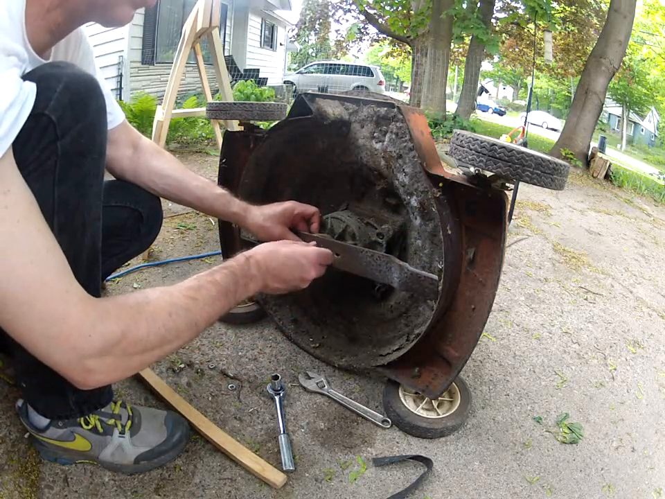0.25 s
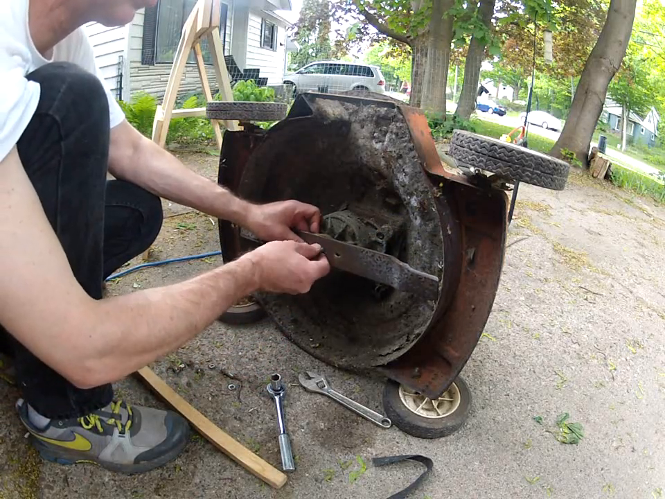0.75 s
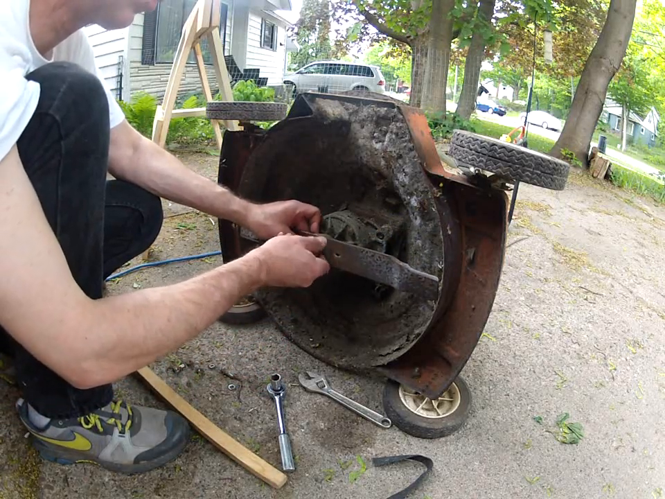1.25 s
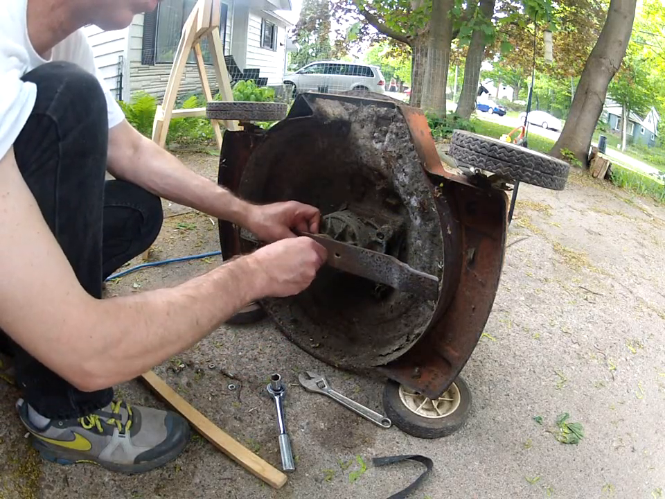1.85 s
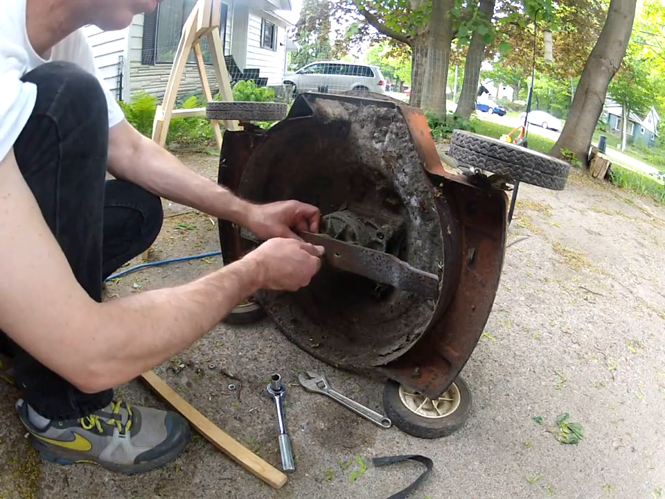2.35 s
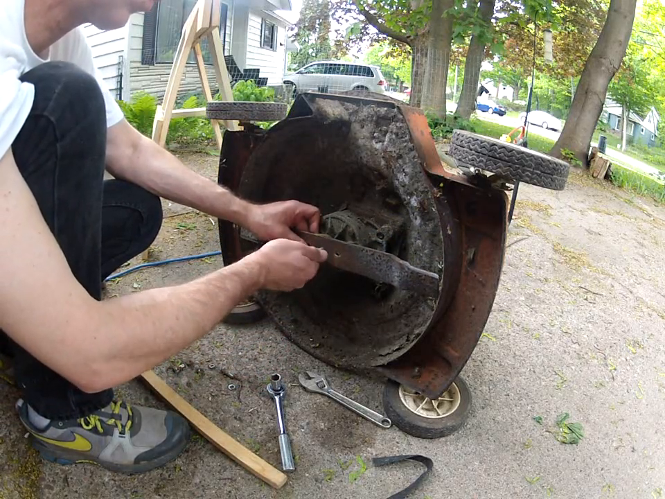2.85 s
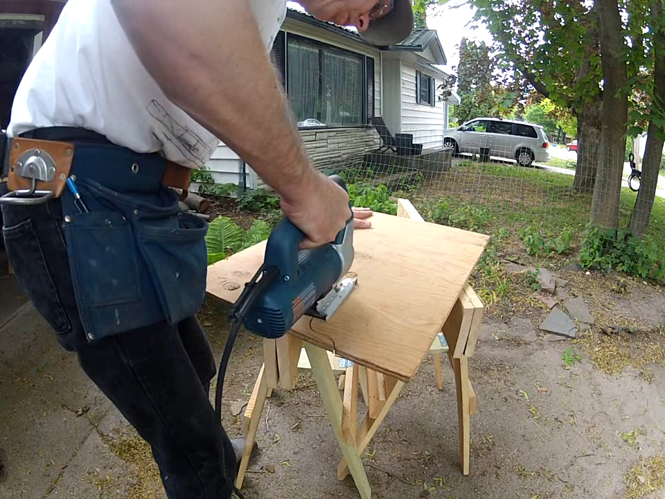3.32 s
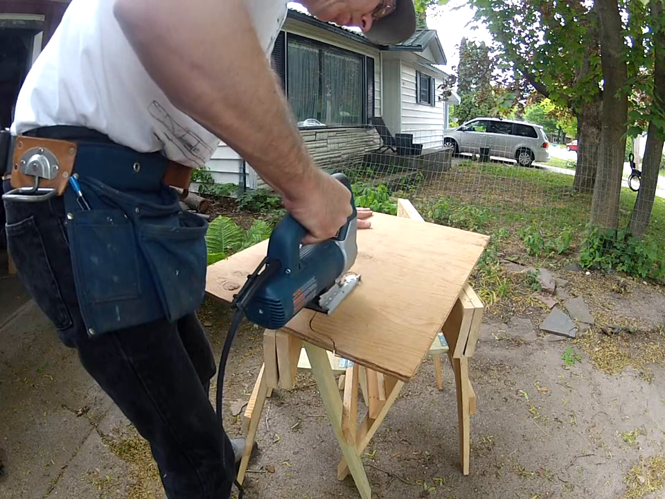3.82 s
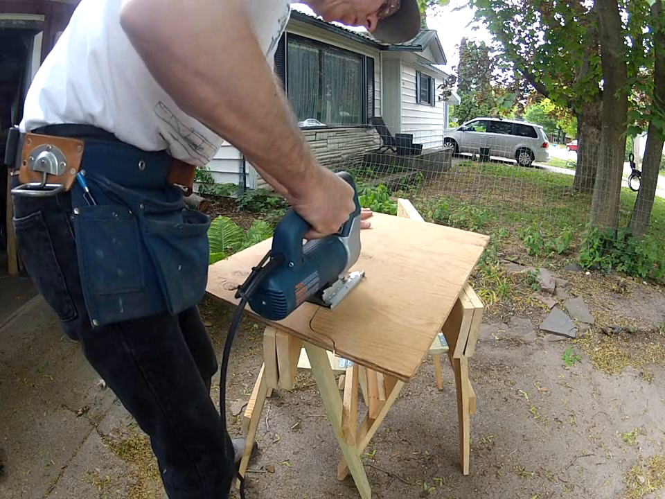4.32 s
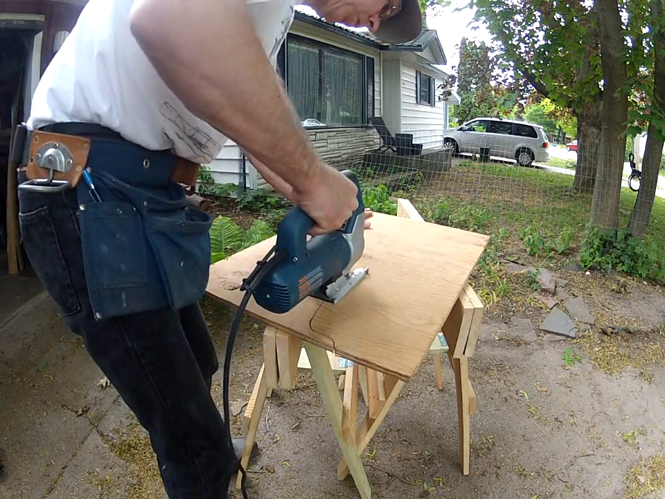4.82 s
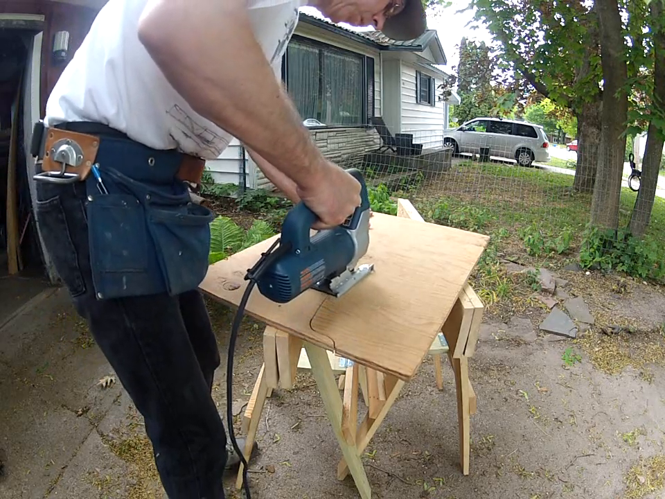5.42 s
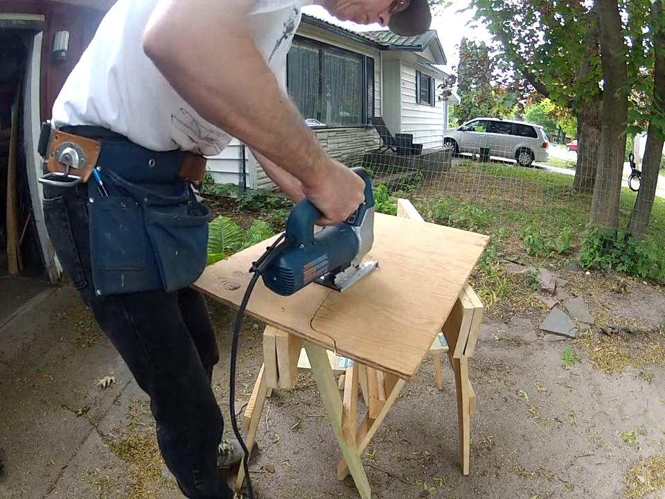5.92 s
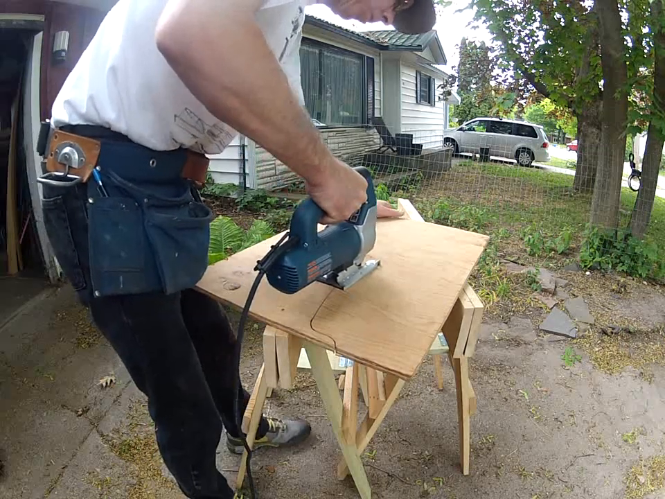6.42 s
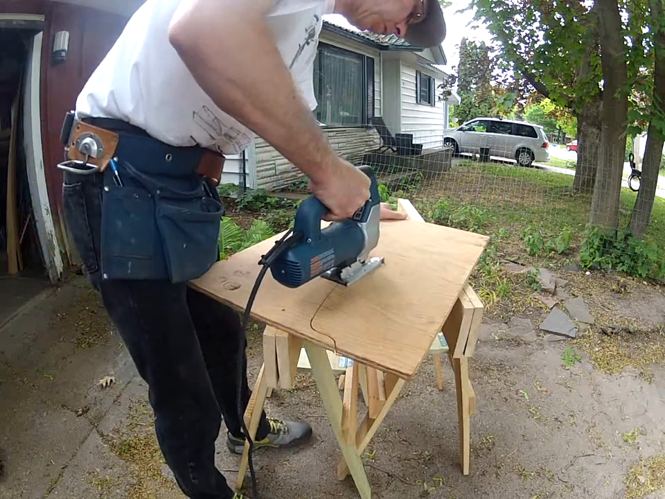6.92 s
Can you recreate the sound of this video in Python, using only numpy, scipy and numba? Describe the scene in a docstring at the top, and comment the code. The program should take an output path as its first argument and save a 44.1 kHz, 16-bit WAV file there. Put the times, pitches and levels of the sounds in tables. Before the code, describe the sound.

A vehicle drones away in a quiet driveway, small birds whistle, then after a blink of silence a buzzing jigsaw hammers and rasps through a board.

```python
"""A driveway: a vehicle's engine note sinks and its rumble, tyre drone and hiss fade; small birds chirp in
sliding whistles and fingers scuff steel. After an instant of silence a jigsaw is abruptly cutting plywood:
each stroke drums the sheet, gears clatter in a repeating pattern of noise and the teeth rasp in noisy grains.
The blade binds, the saw hops on the board with thuds and cracks, then runs nearly free in humming overtones.
A limiter ducks and flattens the loud knocks throughout, and held coarse samples add a gritty top."""
import sys
import numpy as np
from scipy import signal
from scipy.fft import rfft, irfft, next_fast_len
from scipy.io import wavfile
from scipy.ndimage import uniform_filter1d
from numba import njit

SR = 44100
rng = np.random.default_rng(int(sys.argv[2]) if len(sys.argv) > 2 else 0)


def wav_record(signal):
    """Record a signal, one row per channel, as 16-bit PCM in the file named by sys.argv[1]."""
    frames = np.transpose(np.atleast_2d(signal))
    bounded = np.clip(frames, -1, 1)
    # unit amplitude maps onto the largest positive 16-bit level
    quanta = np.round(bounded * 32767).astype(np.int16)
    wavfile.write(sys.argv[1], SR, quanta)


N = 315756
T = np.arange(N) / SR
FFT_SIZE = 2 * next_fast_len((N + SR) // 2, True)
FREQS = np.arange(FFT_SIZE // 2 + 1) * SR / FFT_SIZE
SAW_START_S, FIRST_STROKE_S = 3.149, 3.1612


def undb(db):
    """Decibels to gain."""
    return np.exp(np.asarray(db) * (np.log(10) / 20))


def curves(rows):
    """Each column of a table of (s, ..) rows, joined by straight lines."""
    s, *columns = np.transpose(rows)
    return [np.interp(T, s, column) for column in columns]


def filtered(x, response):
    """Applies a frequency response given on FREQS."""
    return irfft(rfft(x, FFT_SIZE) * response, FFT_SIZE)[:N]


def colour(x, points):
    """Causal filter through (Hz, dB) points, falling 20 dB per octave for two octaves beyond both ends."""
    hz, db = np.transpose(points)
    octave, known = np.log2(FREQS + 1), np.log2(hz)
    outside = np.maximum(known[0] - octave, 0) + np.maximum(octave - known[-1], 0)
    gain_db = np.interp(octave, known, db) - 20 * np.minimum(outside, 2)
    # folding the cepstrum onto positive time makes the filter minimum phase
    cepstrum = irfft(np.log(undb(gain_db)))
    folded = 2 * rfft(cepstrum[:FFT_SIZE // 2], FFT_SIZE) - cepstrum[0]
    return filtered(x, np.exp(folded))


def ring(x, modes):
    """Resonances of (Hz, width Hz, dB) side by side."""
    response = 0
    for hz, width, db in modes:
        damping = 1j * FREQS * width
        response = response + undb(db) * damping / (hz ** 2 - FREQS ** 2 + damping)
    return filtered(x, response)


def moving_ring(x, hz, width_hz):
    """A steep resonance whose centre follows a curve: shift it to 0 Hz, lowpass, shift back."""
    spin = np.exp(2j * np.pi * np.cumsum(hz) / SR)
    lowpass = signal.butter(2, width_hz / 2, fs=SR, output="sos")
    return (signal.sosfilt(lowpass, x / spin) * spin).real


def unit(x, band=None):
    """Scales to rms 1, counted within a band in Hz if one is given."""
    counted = x if band is None else filtered(x, (FREQS > band[0]) & (FREQS < band[1]))
    return x / np.std(counted)


def noise():
    """White noise."""
    return rng.standard_normal(N)


def walk(rate):
    """Random levels held 1 / rate s and slewed twice; spread 1."""
    hold = int(SR / rate)
    steps = noise()[np.arange(N) // hold]
    return unit(uniform_filter1d(uniform_filter1d(steps, hold), hold))


def swell(start, length):
    """One smooth rise and fall."""
    return np.sin(np.pi * np.clip((T - start) / length, 0, 1))


def yard(x, t60, wet_db):
    """Adds scattered echoes from the house, the ground and the trees, as a decaying noise tail."""
    tail = noise() * undb(-60 * T / t60) * (T > .008)
    echoes = filtered(x, rfft(tail / np.linalg.norm(tail), FFT_SIZE))
    return x + undb(wet_db) * echoes


def taps(times, sizes):
    """Single blows at the given times."""
    return np.bincount(np.clip(times * SR, 0, N - 1).astype(int), sizes, N)


def repeating(turns, wobble, size=1024):
    """A flat noise that comes round with every turn, its timing unsteady by wobble (in turns)."""
    pattern = irfft(np.exp(2j * np.pi * rng.random(size // 2 + 1)))
    angle = turns + wobble * walk(30)
    return unit(np.interp(angle, np.arange(size) / size, pattern, period=1))


# Speed of the saw. Each row: time in seconds, strokes per second in Hz.
SAW_SPEED = [(3.15, 39.84), (3.7, 40.59), (4.5, 40.44), (5.0, 40.99), (5.3, 41.02), (5.72, 40.06),
             (6.3, 40.44), (6.6, 43.02), (6.76, 43.2), (7.0, 41.0), (7.16, 40.2)]


def jigsaw():
    """The crank drives all but the hops; the sheet's upper resonance is driven twice a turn, by both strokes."""
    turns = np.cumsum(curves(SAW_SPEED)[0]) / SR
    turns = turns - np.interp(FIRST_STROKE_S, T, turns)
    low_drive = repeating(turns, wobble=.0012)
    low = panel(low_drive, LOW_RESONANCE, width_hz=120, rough=.7)
    high_drive = repeating(2 * turns, wobble=0.00067, size=512)
    high = panel(high_drive, HIGH_RESONANCE, width_hz=117, rough=0.53)
    return teeth(turns) + gears(turns) + drumming(turns) + low + high + free_run(turns) + hopping()


# How hard the sheet drums under the shoe. Each row: time in seconds, level in dB.
DRUM_LEVEL = [(3.15, -8.5), (3.7, -8), (4.22, -12.5), (4.33, -9.5), (4.73, -13), (4.79, -27.5), (5.05, -25),
              (6.1, -21), (6.2, -29), (7.16, -34)]
# Colour of the held sheet. Each row: frequency in Hz, relative gain in dB.
SHEET_COLOUR = [(81, -32), (121, -21), (162, -1), (202, -9), (243, -21), (283, -14), (324, -0.5),
                (364, -2.5), (405, -15.5), (445, -17), (486, -11), (530, -26), (720, -20), (810, -24.5),
                (900, -31.5), (1120, -28)]


def drumming(turns):
    """Upstrokes lift the sheet against the shoe; as the cut turns, blows grow uneven and downstrokes harder."""
    count = np.arange(0, int(turns[-1]))
    up_times = np.interp(count, turns, T)
    down_times = np.interp(count + .5, turns, T)
    chance = rng.standard_normal((len(count), 4))
    uneven = np.interp(up_times, [4.1, 4.5], [.3, 1])
    # strong and weak in turn, plus chance
    up_db = uneven * (2.2 * chance[:, 1] + 1.5 * (-1) ** count)
    up = taps(up_times + .0003 * uneven * chance[:, 0], undb(up_db))
    down_size = 0.2 * uneven ** 2 * undb(5.1 * chance[:, 3])
    down = taps(down_times + 0.0018 * chance[:, 2], down_size)
    sheet = colour(up + down, SHEET_COLOUR)
    return sheet / np.std(sheet[T > SAW_START_S]) * undb(curves(DRUM_LEVEL)[0])


# The saw hops and lands on the sheet. Each row: time in seconds, strength in dB.
LANDINGS = [(4.372, -5), (5.010, -11), (5.033, -5.5), (5.179, -7), (5.355, -6.5), (5.381, -13), (5.405, -2),
            (5.457, -6), (5.501, 4), (5.551, 3), (5.601, 6.5), (5.652, 2), (5.698, 4), (5.748, 5),
            (5.799, 2), (5.850, -3.5), (5.899, 3), (5.948, 1), (5.998, 6), (6.051, -1), (6.099, 7),
            (6.174, -3), (6.298, -6.5), (6.863, -6), (6.888, -6), (6.931, -5), (7.031, -5), (7.079, -8),
            (7.128, -3.5)]
# Colour of a landing. Each row: frequency in Hz, relative gain in dB.
LANDING_COLOUR = [(40, -37), (90, -3.5), (140, -10.5), (205, 2.5), (250, 1), (320, -5.5), (450, -11.5),
                  (630, -6), (900, -25.5), (1400, -23), (3000, -40), (6000, -54)]
LANDING_DB, BOOM_DB, CRACK_DB = -0.5, -17, -16.5
REBOUND_S, REBOUND_SHARE, CRACK_S = .006, 0.93, 0.0034


def hopping():
    """The shoe slams down and rebounds once, each blow cracking; the loose sheet booms on its trestle."""
    s, db = np.transpose(LANDINGS)
    slams = taps(s, undb(db))
    blows = slams + taps(s + REBOUND_S, REBOUND_SHARE * undb(db))
    thud = colour(blows, LANDING_COLOUR)
    boom = ring(slams, [(206, 12, 0)])
    body = undb(LANDING_DB) * thud / np.max(np.abs(thud)) + undb(BOOM_DB) * boom / np.max(np.abs(boom))
    crack_decay = signal.lfilter([1], [1, -np.exp(-1 / (CRACK_S * SR))], blows)
    crack = unit(colour(noise(), TEETH_COLOUR)) * crack_decay
    return yard(slams.max() * body + undb(CRACK_DB) * crack, t60=0.09, wet_db=-7)


# How hard the teeth bite. Each row: time in seconds, level of the rasp in dB.
BITE_LEVEL = [(3.15, -23.5), (4.45, -23), (4.85, -20), (5.45, -21.5), (5.65, -24), (6.5, -23.5),
              (6.8, -20.5), (7.16, -22.5)]
# Colour of the teeth, also of the landing cracks. Each row: frequency in Hz, relative gain in dB.
TEETH_COLOUR = [(150, 4), (300, -31), (420, 8.5), (520, -5), (670, 2.5), (1000, -9), (1400, 0),
                (1750, -7.5), (2100, -0.5), (2330, -6), (2600, 3.5), (2800, 0), (3100, 1), (3700, -8),
                (4300, -11.5), (4700, -7), (5900, -21.5)]


def teeth(turns):
    """The same teeth pass on every stroke; fibres snap in random grains, in two decaying bursts a turn."""
    bite = 1.56 * np.exp(-(turns % 1) / 0.037) + 1.6 * np.exp(-((turns + 0.43) % 1) / .5)
    snaps = unit(noise() * undb(4.1 * walk(1500) + 1.28 * walk(70)))
    # the faster the saw runs, the less wood it meets and the more its own steady clatter shows
    steady = np.interp(curves(SAW_SPEED)[0], [40.5, 42.5], [.7, 1.3])
    grains = (snaps + steady * repeating(turns, wobble=0.002)) / np.hypot(1, steady)
    rasp = unit(colour(grains * (1 + bite), TEETH_COLOUR), band=(2000, 5500))
    return yard(undb(curves(BITE_LEVEL)[0]) * rasp, t60=0.09, wet_db=-10.5)


# Colour of the gears. Each row: frequency in Hz, relative gain in dB.
GEAR_COLOUR = [(70, -31.5), (122, 1), (165, -10.5), (215, 8), (265, -6.5), (400, 5.5), (500, -4.5),
               (640, -2.5), (820, -4.5), (980, -14), (1200, -11), (1450, -12.5), (1750, -14), (3000, -19)]
# level when the drumming is at QUIET_DB, and the share of its dB above that which shakes the gears too
GEAR_DB, GEAR_SHARE, QUIET_DB = -26.5, .2, -22.5


def gears(turns):
    """Crank and gears clatter the same way on every turn, louder when the sheet shakes the saw."""
    clatter = repeating(turns, wobble=.0004) * undb(2.7 * walk(60))
    db = GEAR_DB + GEAR_SHARE * (curves(DRUM_LEVEL)[0] - QUIET_DB)
    coloured = unit(colour(clatter, GEAR_COLOUR), band=(500, 1600))
    return yard(undb(db) * coloured, t60=0.46, wet_db=-26.0)


# Two resonances of the sheet shift as the cut advances.
# Each row: time in seconds, resonance in Hz, level in dB.
LOW_RESONANCE = [(3.15, 563, -34), (4.3, 603, -24.5), (4.85, 637, -20), (5.25, 652, -20), (5.8, 623, -18),
                 (6.3, 598, -28), (7.16, 595, -19)]
HIGH_RESONANCE = [(3.15, 1158, -19.5), (3.65, 1154, -29.5), (4.3, 1153, -30.5), (4.7, 1300, -33),
                  (5.25, 1424, -29), (5.6, 1364, -24), (6.45, 1420, -49), (6.82, 1350, -25),
                  (7.16, 1140, -40)]


def panel(drive, resonance, width_hz, rough):
    """Overtones of the strokes sing out wherever they meet a resonance of the sheet."""
    hz, db = curves(resonance)
    return undb(db) * unit(moving_ring(drive + rough * noise(), hz, width_hz))


# Colour of the free-running saw. Each row: frequency in Hz, relative gain in dB.
FREE_COLOUR = [(150, -25.5), (215, 0), (258, -3), (320, -19), (385, 8), (420, -1), (460, 5.5), (560, -20.5),
               (730, 0), (800, -18), (980, -13.5), (1075, -7), (1200, -41), (1440, -9), (2000, -32),
               (3100, -9.5), (4300, -19.5)]
FREE_START_S, FREE_LENGTH_S, FREE_DB = 5.98, 1, -20
# the blade's ring at top speed, and its loss per stroke per second below that
BLADE_DB, BLADE_DB_PER_HZ = -29, 5


def free_run(turns):
    """As the push eases, the mechanism hums in clean overtones; the blade rings more the faster it runs."""
    hum = unit(colour(repeating(turns, wobble=.0004), FREE_COLOUR))
    narrow_ring = ring(repeating(turns, wobble=0.00077), [(4740, 150, 0)])
    blade = unit(ring(narrow_ring, [(4940, 530, 0)]))
    speed = curves(SAW_SPEED)[0]
    blade_db = BLADE_DB - BLADE_DB_PER_HZ * (speed.max() - speed)
    return undb(FREE_DB) * swell(FREE_START_S, FREE_LENGTH_S) * hum + undb(blade_db) * blade


# The engine. Each row: time in seconds, engine note in Hz, note level in dB.
ENGINE_NOTE = [(0, 152, -31), (.1, 145.8, -26.5), (.2, 130.6, -24.5), (.3, 111.7, -33.5), (.55, 91.6, -39),
               (.9, 87.6, -30), (1.35, 78.7, -42.5), (3.15, 65.9, -38)]
# Partials of the engine. Each row: multiple of the note, relative level in dB, fading in dB per second.
ENGINE_PARTIALS = [(.58, -8, 21), (1, 2, 10.5), (1.579, -3.5, 3.5), (2.48, -2.5, 47)]
# Drone of the tyres. Each row: time in seconds, level in dB.
TYRE_LEVEL = [(0.05, -24.5), (0.09, -23), (0.28, -21.5), (0.9, -42.5), (2.06, -47.5), (2.21, -50.5),
              (2.51, -48), (2.72, -52)]
# Colours of the rumble, the tyre drone and the hiss. Each row: frequency in Hz, relative gain in dB.
RUMBLE_COLOUR = [(20, -26), (45, -7), (70, -2.5), (110, 0), (150, -4), (220, -8.5), (330, -15.5),
                 (450, -12.5), (900, -27)]
DRONE_COLOUR = [(250, -19), (400, -16), (470, -6.5), (530, -5), (610, 1.5), (680, -10), (760, -17),
                (950, -47), (1500, -41)]
HISS_COLOUR = [(500, -22), (850, -1.5), (952, -9.5), (1220, -6.5), (1540, -13.5), (1940, -11),
               (2620, -12.5), (2960, -9), (4230, -23), (5100, -20.5), (5900, -35), (7670, -63),
               (13000, -120)]
# nearest moment, and the time the vehicle needs to cover its nearest distance
PASS_S, PASS_WIDTH_S = 0.11, 0.14
# level when nearest, and loss per tenfold distance
RUMBLE_DB, RUMBLE_LOSS_DB, HISS_DB, HISS_LOSS_DB = -30, 13.5, -40.5, 13


def vehicle():
    """The engine note sinks as it draws away; rumble and hiss fade with distance, the tyres drone on."""
    hz, note_db = curves(ENGINE_NOTE)
    phase = 2 * np.pi * np.cumsum(hz * (1 + 0.011 * walk(25))) / SR
    note = np.zeros(N)
    for multiple, db, fade in ENGINE_PARTIALS:
        partial_db = note_db + db - fade * T + 0.67 * walk(7.6)
        note += undb(partial_db) * np.sin(multiple * phase)
    # tenfold steps of distance, 0 when nearest
    far = np.log10(np.hypot(1, (T - PASS_S) / PASS_WIDTH_S))
    rumble = unit(colour(noise(), RUMBLE_COLOUR)) * undb(RUMBLE_DB - RUMBLE_LOSS_DB * far)
    hiss = unit(colour(noise(), HISS_COLOUR), band=(1000, 3500)) * undb(HISS_DB - HISS_LOSS_DB * far)
    drone = unit(colour(noise(), DRONE_COLOUR)) * undb(curves(TYRE_LEVEL)[0])
    return note + rumble + drone + hiss


# Bird chirps. Each row: start in seconds, length in seconds, start pitch in Hz, end pitch in Hz, peak in dB.
BIRD_CHIRPS = [(1.52, .04, 5940, 5430, -70), (1.609, 0.061, 5070, 4600, -64), (1.73, .04, 5950, 5550, -74),
               (1.905, 0.058, 5990, 5600, -64), (2.051, 0.064, 4610, 4990, -62),
               (2.085, 0.079, 5350, 4800, -69), (2.335, 0.041, 5270, 4600, -62),
               (2.462, .025, 5900, 5400, -68), (2.583, 0.086, 4250, 4820, -60),
               (2.625, 0.044, 5930, 5300, -63), (2.779, 0.027, 5730, 5460, -59)]


def birds():
    """Thin whistles that slide quickly and level off, echoing among the trees."""
    song = np.zeros(N)
    for start, length, from_hz, to_hz, db in BIRD_CHIRPS:
        left = 1 - np.clip((T - start) / length, 0, 1)
        # each call is slightly rough
        hz = to_hz + (from_hz - to_hz) * left ** 2 + 110 * walk(430)
        song += undb(db) * swell(start, length) * np.sin(2 * np.pi * np.cumsum(hz) / SR)
    return yard(song, t60=0.72, wet_db=2)


SCUFF_S, SCUFF_LENGTH_S, SCUFF_DB = 2.777, .16, -55


def handling():
    """Hands shift on a mower blade: a faint dry scuff of fingers on rusty steel, as resonant noise."""
    rub = unit(ring(noise(), [(380, 200, 3.9), (3360, 450, 1.9)]))
    return rub * undb(SCUFF_DB) * swell(SCUFF_S, SCUFF_LENGTH_S)


def breeze():
    """Air stirs softly at the microphone while the saw runs: low noise of unsteady level."""
    air = unit(colour(noise(), [(15, 13), (35, -15), (90, 11), (130, -13)]))
    return air * undb(-50.5 + 2.9 * walk(11))


def scene():
    """The quiet driveway, an instant of silence, then the saw in mid-cut."""
    quiet = (vehicle() + birds() + handling()) * (T < SAW_START_S - .016)
    cutting = (jigsaw() + breeze()) * (T >= SAW_START_S)
    return (quiet + cutting)[None]


@njit
def follow(x, attack, release):
    """Envelope that rises fast and falls slowly."""
    out, e = np.empty(len(x)), 0.
    for i in range(len(x)):
        e += (abs(x[i]) - e) * (attack if abs(x[i]) > e else release)
        out[i] = e
    return out


LIMIT_DB, LIMIT_ATTACK_S, LIMIT_RELEASE_S = -3, 0.00097, 0.14


def limiter(x):
    """Ducks when the envelope passes the limit; peaks that slip through are flattened."""
    loudness = follow(x, 1 / (LIMIT_ATTACK_S * SR), 1 / (LIMIT_RELEASE_S * SR))
    limited = x / np.maximum(1, loudness / undb(LIMIT_DB))
    return np.clip(limited, -.97, .97)


HOLD_HZ, TOP_HZ = 12000, 15350


def coarse_hold(x):
    """Holding each coarse sample mirrors the sound around the holding rate, drooping toward it."""
    droop = np.sinc(FREQS / HOLD_HZ)
    # lowpass at half the holding rate, with the droop lifted back beforehand
    guard = 1 / np.sqrt(1 + (FREQS / (HOLD_HZ / 2)) ** 40)
    sampled = filtered(x, guard / np.maximum(droop, .5))
    return filtered(sampled * (1 + 2 * np.cos(2 * np.pi * HOLD_HZ * T)), droop)


def record(dry):
    """The limiter, then the held coarse samples, then a steep cut of the top."""
    held = coarse_hold(limiter(dry[0]))
    top_cut = signal.ellip(12, .1, 80, TOP_HZ, fs=SR, output="sos")
    return signal.sosfilt(top_cut, held)[None]


dry = scene()
out = record(dry)
wav_record(out)
```